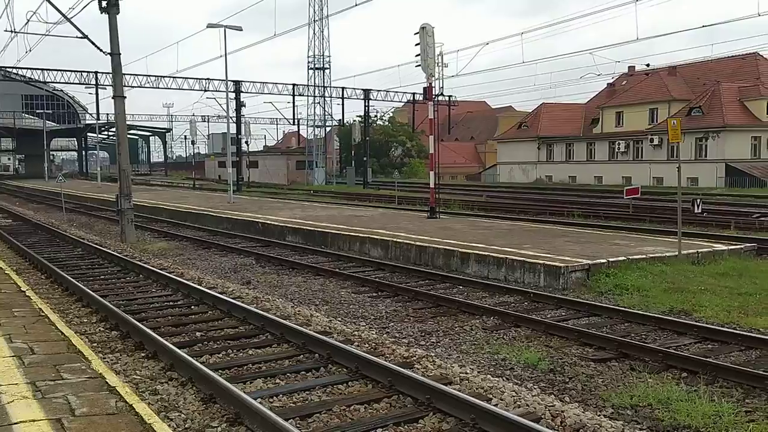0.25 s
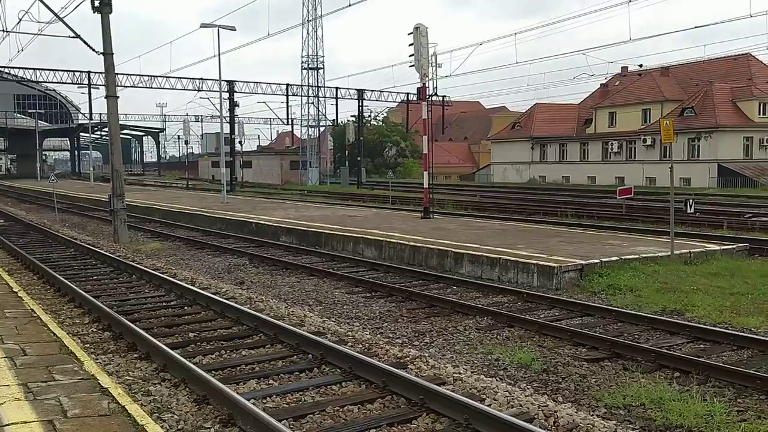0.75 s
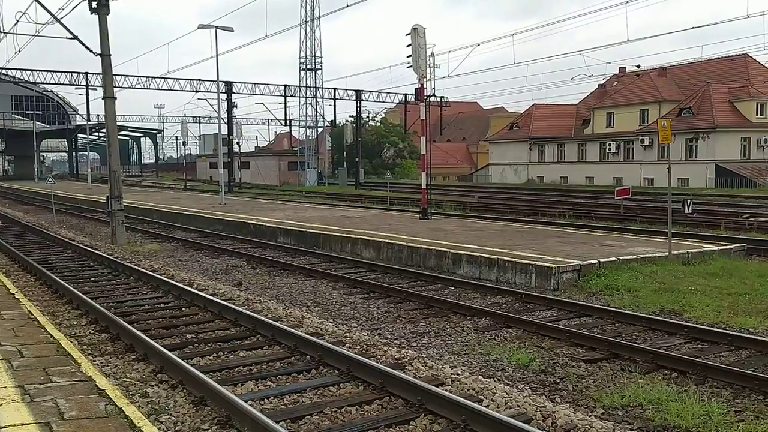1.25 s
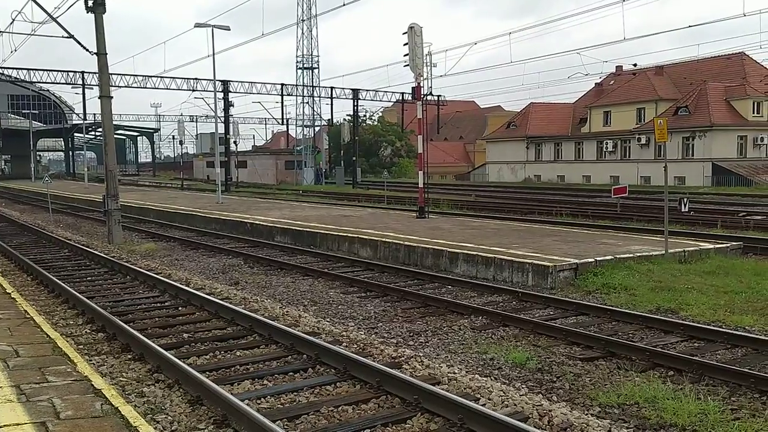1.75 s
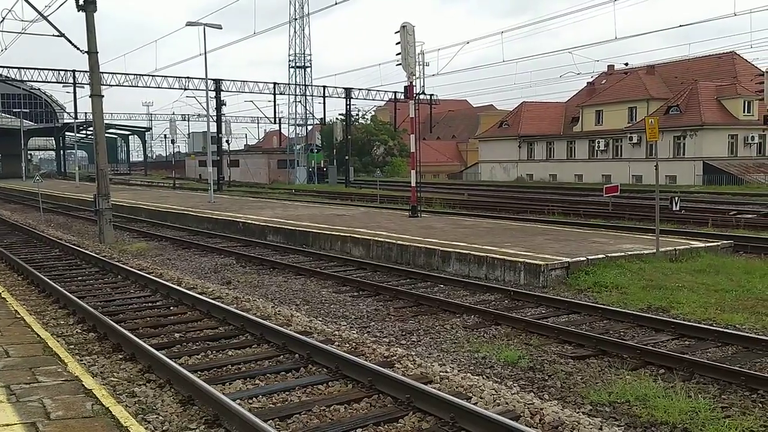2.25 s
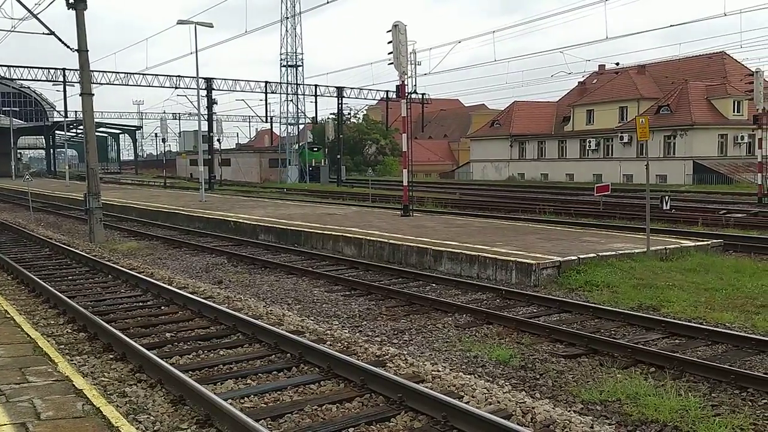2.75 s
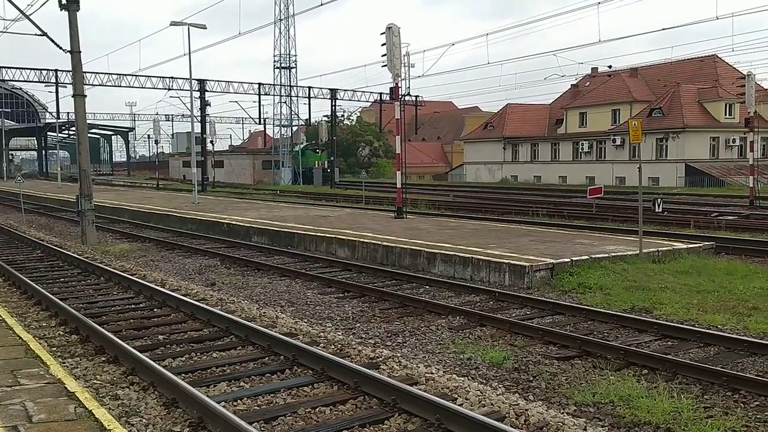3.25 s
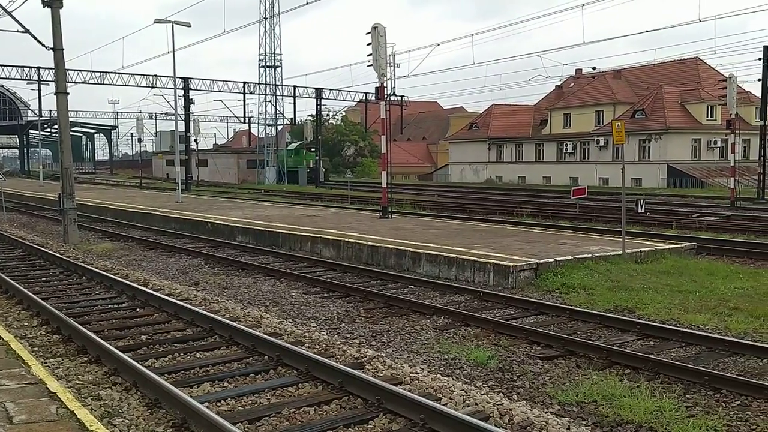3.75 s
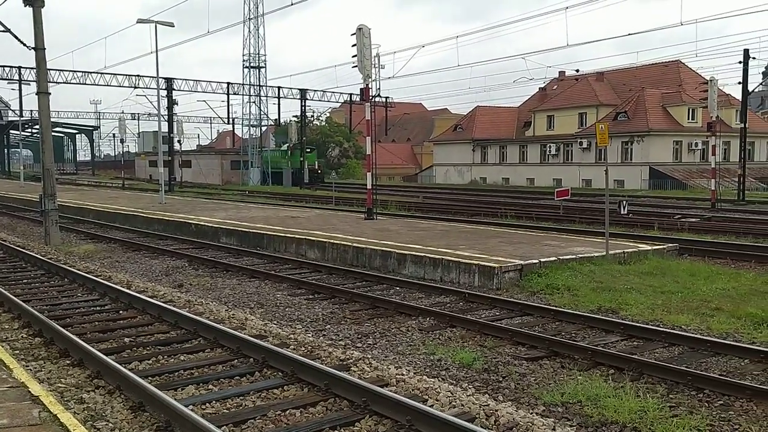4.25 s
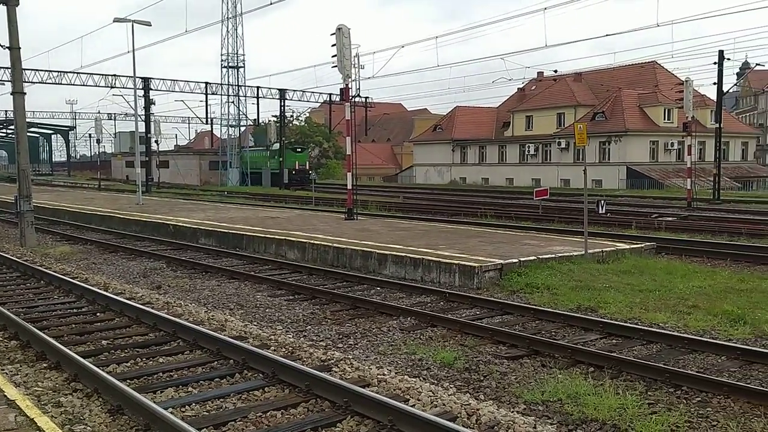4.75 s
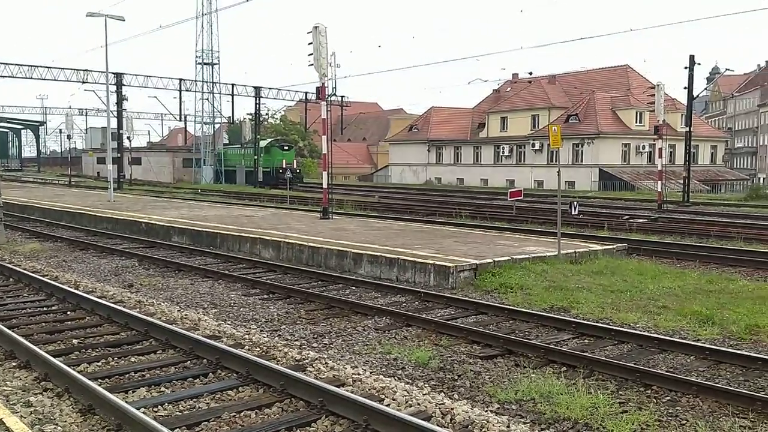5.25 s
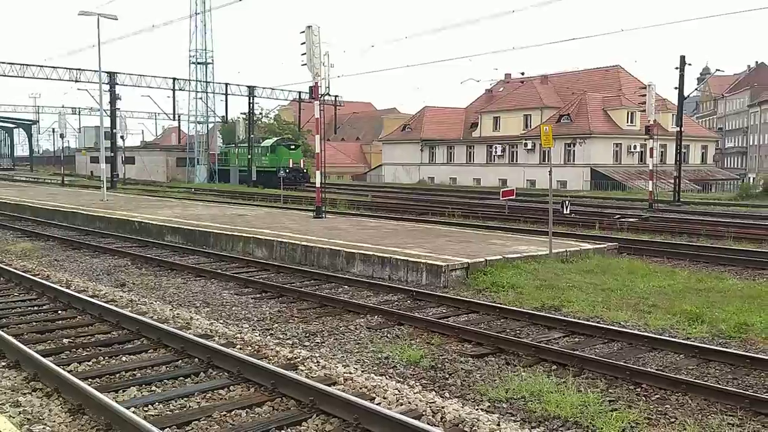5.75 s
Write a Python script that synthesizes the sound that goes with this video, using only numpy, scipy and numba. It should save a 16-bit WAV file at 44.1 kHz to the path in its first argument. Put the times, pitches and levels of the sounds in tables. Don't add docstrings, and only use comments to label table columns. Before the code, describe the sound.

Hand-held stereo camera on an outdoor platform: distant wagons bump, airy hiss fills in, and a diesel engine rumbles unevenly. Its thin blower whine comes out clearly after about two seconds, fluttering as it shifts between sides. The engine grows moderately louder and fuller. Close handling ticks and thumps cluster on the left past four seconds, with a few isolated clicks later and a late dull knock.

```python
import sys
import numpy as np
from scipy import signal
from scipy.fft import rfft, irfft, next_fast_len
from scipy.io import wavfile
from scipy.ndimage import uniform_filter1d
from numba import njit

SR = 44100
rng = np.random.default_rng(int(sys.argv[2]) if len(sys.argv) > 2 else 0)


def linear_from_db(decibels):
    return 10 ** (np.asarray(decibels, float) / 20)


def materialize(psi):
    bounded = np.clip(np.atleast_2d(psi).T, -1, 1)
    quanta = np.round(bounded * 32767).astype(np.int16)
    wavfile.write(sys.argv[1], SR, quanta)


N = 264897
T = np.arange(N) / SR
LEFT_RIGHT = np.array([[1], [-1]])


def curve(table):
    s, *columns = np.transpose(table)
    return [np.interp(T, s, column) for column in columns]


def swells(table):
    s, half, *columns = np.transpose(table)
    t = T[::64]
    bell = np.exp(-((t[:, None] - s) / half) ** 2)
    return [np.interp(T, t, bell @ column) for column in columns]


def unit(x):
    return x / np.sqrt(np.mean(x ** 2))


@njit
def svf(x, hz, q):
    y, b, l = np.empty(len(x)), 0., 0.
    for i in range(len(x)):
        g = np.pi * hz[i] / SR
        g += g ** 3 / 3 + g ** 5 * 2 / 15
        v = (b + g * (x[i] - l)) / (1 + g * (g + 1 / q))
        b, l, y[i] = 2 * v - b, l + 2 * g * v, v / q
    return y


def narrow(x, hz, q):
    hz = hz + np.zeros(len(x))
    return svf(svf(x, hz, q), hz, q)


def band(hz, q):
    return narrow(rng.standard_normal(N), hz, q)


def walk(rate):
    step = np.arange(0, N + 32, 32) / SR
    k = max(int(1 / rate / step[1]), 1)
    held = np.repeat(rng.standard_normal(len(step) // k + 1), k)[:len(step)]
    smooth = uniform_filter1d(uniform_filter1d(held, k), k)
    return 1.61 * np.interp(T, step, smooth)


def stereo(mid, side, alike, pan_db):
    ports = np.sqrt(alike) * mid + np.sqrt(1 - alike) * side * LEFT_RIGHT
    return ports * linear_from_db(.5 * LEFT_RIGHT * pan_db)


def colour(spectrum, flicker_db, half_hz):
    size, (hz, db) = next_fast_len(N), np.transpose(spectrum)
    octave = np.log2(np.arange(1, size // 2 + 2) * SR / size)
    pan_db = np.interp(octave, np.log2([700, 1300, 2400, 4400, 9000]), [3.5, 7.5, 3.5, -4.0, -0.8])
    alike = .5 + 0.46 / (1 + 2 ** octave / half_hz)
    mid, side = rfft(rng.standard_normal((2, size)))
    both = stereo(mid, side, alike, pan_db) * linear_from_db(np.interp(octave, np.log2(hz), db))
    lag = np.interp(octave, np.log2([60, 1000]), [.05, .2])
    both = both * np.exp(-1j * lag * LEFT_RIGHT)
    out = 0
    for centre in np.arange(np.log2(hz[0]), np.log2(hz[-1]) + .5, .5):
        share = np.cos(np.pi * np.clip(octave - centre, -.5, .5)) ** 2
        top_db = 2.5 * (centre > 13.5)
        flicker = linear_from_db((flicker_db + top_db) * walk(9))
        out = out + flicker * irfft(both * share, size)[:, :N]
    return unit(out)


def exhaust(crank):
    firings = [.1673, .6459, .7431, .7596, .8508, .9414]
    # (multiple of the cycle rate, far level [dB], near level [dB])
    orders = [(6, -47, -42.5), (7, -74, -53), (10, -71, -86), (11, -50, -40.5), (12, -52, -51),
              (13, -49.5, -54), (14, -53.5, -61), (15, -47.5, -39.5), (16, -57.5, -42), (18, -49, -50.5),
              (19, -54, -46), (20, -55.5, -55), (23, -75, -53), (25, -54.5, -59.5)]
    out = 0
    for order, far_db, near_db in orders:
        order = round(order)
        phase = np.angle(np.sum(np.exp(-2j * np.pi * order * np.array(firings))))
        db = far_db + (near_db - far_db) * (T - .75) / 4.5 + .8 * walk(1.5)
        out = out + linear_from_db(db) * np.exp(1j * (order * crank + phase))
    throb_db = -2 + 2 * np.sin(np.pi * T / T[-1])
    ports = linear_from_db(np.array([[1.8], [-2.2]])) * np.exp(-.06j * LEFT_RIGHT)
    return np.sqrt(2) * linear_from_db(throb_db) * (out * ports).real


def blower(crank, near_db):
    # (time [s], frequency [Hz])
    blade_hz = [(0, 1727), (1.5, 1708), (2, 1702), (4, 1685), (6.01, 1672)]
    # (time [s], level [dB])
    whine = [(0.0, -57.5), (0.67, -52.5), (1.47, -54.1), (1.59, -44), (1.94, -35), (2.46, -27.5),
             (3.31, -32.2), (3.69, -34.5), (4.39, -27), (4.67, -31), (4.96, -34.5), (5.59, -30),
             (6.01, -25.5)]
    # (time [s], half length [s], left level [dB], right level [dB])
    fades = [(0.336, 0.043, -14, -6), (0.734, 0.062, 2, -17), (0.996, 0.1, 2, -12), (1.169, 0.055, -8, -2),
             (1.512, 0.028, -7, 5), (1.778, 0.094, -13, -2), (1.99, 0.068, -11, -2), (2.3, 0.212, -9, -4.5),
             (2.64, 0.13, -7, -3.5), (2.928, 0.13, -14.5, -5.5), (3.34, 0.054, -8, 1.5),
             (3.517, 0.09, -15, -4), (3.93, 0.026, -7, -2), (4.022, 0.12, -7, -9), (4.137, 0.036, -12, 5.5),
             (4.24, 0.2, -15, -13.5), (4.28, 0.058, -1, -5.5), (4.476, 0.055, -2, -9),
             (4.581, 0.055, -22, -4.5), (4.7, 0.03, 2, -11), (4.833, 0.058, 1, -12), (4.917, 0.045, -15, 3),
             (5.017, 0.019, -13, -4), (5.119, 0.049, -15, -1.5), (5.212, 0.068, -4, -4),
             (5.335, 0.038, -10, -5), (5.432, 0.029, -15, -5), (5.64, 0.067, -10, -3.5),
             (5.792, 0.037, -7.5, -2.5), (5.945, 0.067, -16.5, -7)]
    # (time [s], half length [s], level [dB])
    octave_swells = [
        (2.35, 0.28, 15.5),
        (2.85, .2, 4),
        (4.6, 0.52, 7.5),
        (5.75, 0.32, 11.5),
    ]
    # (time [s], half length [s], extra lag [rad], level [dB])
    swings = [
        (3.55, .05, .8, -1),
        (3.98, .025, 1.9, -2),
        (5.275, .035, 2.15, -4),
    ]
    turn = 2 * np.pi * np.cumsum(curve(blade_hz)[0]) / SR
    hz, db = curve(blade_hz)[0], curve(whine)[0]
    port_fades = swells(fades)
    octave_db = -74.5 + near_db + swells(octave_swells)[0]
    echo_db = -54.5 - 9 * np.clip(T - 1.6, 0, 1.4) ** 2
    shake = np.cos(6 * crank)
    swing, dim_db = swells(swings)
    out = []
    for side, fade_db in zip((.5, -.5), port_fades):
        phase = turn - side * (1.06 + swing) + 0.052 * walk(15) + 0.22 * walk(120)
        tone = linear_from_db(db + fade_db + dim_db + 1.1 * walk(30)) * (1 + 0.1 * shake) * np.cos(phase)
        tone = tone + linear_from_db(octave_db + 1.9 * walk(10)) * (1 + 0.4 * shake) * np.cos(2 * phase)
        skirt_db = 0.38 * (db + np.mean(port_fades, axis=0)) - 36.5
        skirt = linear_from_db(skirt_db) * unit(band(hz + 25, 9.8))
        echo = linear_from_db(echo_db + 3.0 * walk(11)) * np.cos(.978 * turn + 1.1 * walk(12))
        out.append(np.sqrt(2) * (tone + echo) + skirt)
    return np.array(out)


def running_gear(crank, near_db):
    # (frequency [Hz], level [dB per Hz])
    roar_spectrum = [(14, -3), (33, -3), (60, -2), (90, -4), (125, -9), (185, 0), (225, -2), (280, -10),
                     (520, -9), (770, -15), (1000, -13), (1400, -19), (2500, -21), (3100, -32)]
    # (time [s], level [dB], centre frequency [Hz])
    fan_course = [(0, -51.5, 2100), (.5, -58, 2174), (1.6, -60.5, 2080), (2.2, -51.5, 2228),
                  (3.95, -51, 2174), (4.33, -55, 2200), (5.05, -51.5, 2053), (5.48, -53, 2130),
                  (6.01, -49.5, 2070)]
    # (time [s], half length [s], level [dB])
    gear_swells = [(.54, 0.056, 11.5), (.85, .15, -11), (1.2, 0.035, 9.5), (1.84, 0.1, 7),
                   (2.47, 0.078, 11.5), (2.95, .14, 7), (3.62, 0.085, 10.5), (4.2, .15, 4.5),
                   (4.66, 0.16, 8.5), (5.08, 0.089, 5.5), (5.38, 0.29, 9.5), (5.9, 0.088, 6.5)]
    pulse = 1 + 0.017 * np.cos(5 * crank)
    roar = linear_from_db(-49.5 + near_db + 6.0) * pulse * colour(roar_spectrum, 1.55, 1670)

    fan_db, fan_hz = curve(fan_course)
    fan_mid = unit(band(fan_hz, 8.8)) + 0.26 * unit(band(1.161 * fan_hz, 10.6))
    fan = linear_from_db(fan_db) * stereo(fan_mid, unit(band(fan_hz, 5.5)), 0.86, 0.2)
    duct_mid, duct_side = unit(band(0.43 * fan_hz, 8.2)), unit(band(0.434 * fan_hz, 3.0))
    duct = linear_from_db(fan_db - 1.5) * stereo(duct_mid, duct_side, 0.62, 4.2)

    gear_db = -58.5 + 1.32 * near_db + swells(gear_swells)[0]
    gear_hz = 237.7 * (1 + .002 * walk(2.985))
    gear_phase = 2 * np.pi * np.cumsum(gear_hz) / SR + 0.053 * walk(4.4)
    hum = linear_from_db(gear_db + 0.59 * walk(14)) * np.cos(gear_phase)
    return roar + fan + duct + np.sqrt(2) * hum * linear_from_db(np.array([[1.8], [-2.2]]))


def yard(near_db):
    # (frequency [Hz], level [dB per Hz])
    air_spectrum = [(2600, -6), (3400, -6), (4600, 0), (6500, -4), (8800, -3), (10200, -5), (11200, -17),
                    (13800, -19), (14600, -50), (15500, -60)]
    # (time [s], half length [s], level [dB])
    sizzle_swells = [
        (3.8, 0.27, -3),
        (5.3, 0.94, 21),
    ]
    hiss_db = -58 + 0.53 * np.maximum(near_db, 0)
    hiss_db = hiss_db - 7.5 * np.exp(-T / 0.9)
    hiss = linear_from_db(hiss_db + 1.1 * walk(3.89)) * colour(air_spectrum, 0.95, 1200)
    rail_db = -78 + swells(sizzle_swells)[0]
    rails = np.array([unit(svf(band(8900., 2.4), 8900 + 0 * T, 2.4)) for port in range(2)])
    return hiss + linear_from_db(rail_db + 0.55 * walk(12)) * rails


def knocks():
    # (time [s], level [dB], centre frequency [Hz], time to die away by 60 dB [s])
    blows = [
        (0, -51.5, 2620, 0.33),
        (.065, -42.5, 1840, 0.45),
        (.26, -49, 1950, 0.27),
        (0.438, -43.5, 1620, 0.51),
        (2.135, -50, 4930, 0.08),
        (2.179, -49, 4770, 0.058),
        (2.22, -56, 5600, .15),
        (2.39, -56, 4800, 0.93),
        (5.73, -46.5, 2050, 0.64),
    ]
    out, t = np.zeros((2, N + SR)), np.arange(SR // 2) / SR
    for s, db, hz, t60 in blows:
        mid, side = (unit(narrow(x, hz, 2.3)) for x in rng.standard_normal((2, len(t))))
        blow = (1 - np.exp(-t / 0.0029)) * np.exp(-t * np.log(1000) / t60)
        start = int(s * SR)
        out[:, start:start + len(t)] += linear_from_db(db) * blow * stereo(mid, side, .85, 0.2)
    return out[:, :N]


def wind():
    # (time [s], length [s], level [dB], edge frequency [Hz], top frequency [Hz])
    puffs = [
        (1.562, 0.032, -34.5, 200, 466),
        (1.602, 0.01, -31, 150.5, 198),
        (1.614, 0.045, -35, 222, 326),
        (3.48, 0.029, -38, 200, 302),
    ]
    out = np.zeros(N)
    for s, length, db, edge_hz, top_hz in puffs:
        arch = np.sin(np.pi * np.clip((T - s) / length, 0, 1))
        hz = (edge_hz + (top_hz - edge_hz) * arch ** 2) * (1 + 0.1194 * walk(150))
        flutter = np.sin(2 * np.pi * np.cumsum(hz) / SR)
        out += linear_from_db(db + 2.7 * walk(150)) * np.sqrt(arch) * flutter
    return out


def rubbing():
    # (time [s], half length [s], level [dB])
    drags = [
        (3.873, .05, -54),
        (4.03, 0.069, -66),
        (4.27, 0.083, -55),
    ]
    # (slip time [s], level [dB], build-up [s])
    rubs = [
        (3.918, -43, .01),
        (4.186, -31.5, 0.011),
        (4.245, -26, 0.0043),
        (4.345, -24, 0.0072),
        (4.405, -50, .02),
    ]
    drag = 0
    for s, half, db in drags:
        drag = drag + linear_from_db(db) * np.exp(-((T - s) / half) ** 4)
    for s, db, rise in rubs:
        release = 0.0023
        drag = drag + linear_from_db(db) * np.exp(-np.maximum((s - T) / rise, (T - s) / release))
    return linear_from_db(4.5 * walk(400) - 13.0) * drag * unit(band(8300.0, 0.85))


def fingers():
    # (time [s], tick level [dB], thump level [dB], tick frequency [Hz])
    slips = [(3.907, -36, -60, 9500), (3.91, -30, -60, 10800), (3.918, -39, -60, 10030),
             (3.921, -25.5, -35, 9150), (4.168, -31, -50, 8950), (4.183, -35, -21, 10900),
             (4.235, -23, -21, 8300), (4.2383, -19, -17, 6750), (4.2475, -30, -26, 7860),
             (4.2488, -23.5, -19.5, 8000), (4.279, -35, -29, 7000), (4.297, -37, -52, 10900),
             (4.332, -43, -42, 8000), (4.343, -19, -38, 8030), (4.3433, -45, -14.5, 9100),
             (4.353, -40, -34, 9050), (4.3822, -29, -30, 7000), (4.3855, -9, -9, 8000),
             (4.3952, -20.5, -25, 7940), (4.403, -34, -37, 9500), (5.1855, -13, -29, 8760),
             (5.253, -22, -27, 7900), (5.8816, -33, -50, 8700), (5.9147, -34.5, -52, 8800)]
    out, t = np.zeros(N), np.arange(900) / SR
    glide_hz = 210 + 4300 * np.exp(-t / .0011)
    swell = (.13 + (t / .0032) ** 2) * np.exp(1 - (t / .0032) ** 1.95) * np.minimum(t / .0004, 1)
    thump = np.sin(2 * np.pi * np.cumsum(glide_hz) / SR) * swell
    ring = np.sin(2 * np.pi * 3300 * t) * (t / 0.0013) * np.exp(1 - t / 0.00048)
    tick_shape = (t / .00028) * np.exp(1 - t / .00028)
    for s, tick_db, thump_db, hz in slips:
        grit = svf(rng.standard_normal(len(t)), 1.15 * hz + 0 * t, 1.3)
        tick = (.6 * np.sin(2 * np.pi * hz * t) + .8 * grit) * tick_shape
        tick = tick + 0.082 * ring + 0.11 * grit * np.exp(-t / 0.0096)
        start = int(s * SR)
        out[start:start + len(t)] += linear_from_db(tick_db) * tick + linear_from_db(thump_db) * thump
    return out


def scene():
    # (time [s], nearness [dB])
    approach = [
        (0, -0.5),
        (.6, 1),
        (1, -1.5),
        (1.6, .5),
        (3, 1.5),
        (4.1, 3.5),
        (5.4, 5),
        (6.01, 5),
    ]
    crank = 2 * np.pi * 3.895 * T
    near_db = curve(approach)[0]
    engine = exhaust(crank) + blower(crank, near_db) + running_gear(crank, near_db)
    far = engine + yard(near_db) + knocks()
    right = wind()
    left = rubbing() + fingers()
    return far + np.array([left, right])


def roll_off(x):
    return signal.sosfilt(signal.butter(12, 16660, fs=SR, output="sos"), x)


def record(dry):
    cut = signal.butter(12, 15500, fs=SR, output="sos")
    mix = signal.sosfilt(cut, dry)
    return roll_off(mix)


dry = scene()
out = record(dry)
materialize(out)
```